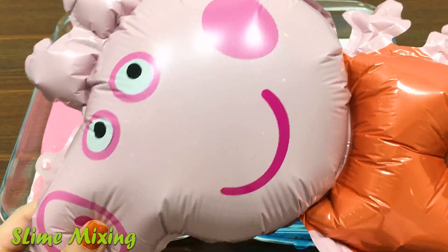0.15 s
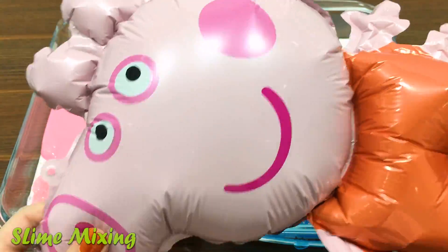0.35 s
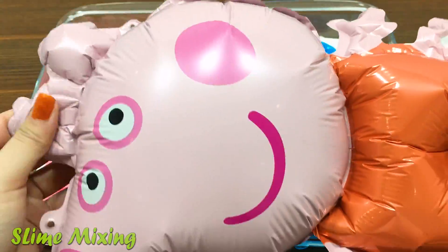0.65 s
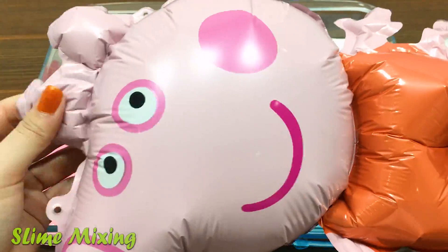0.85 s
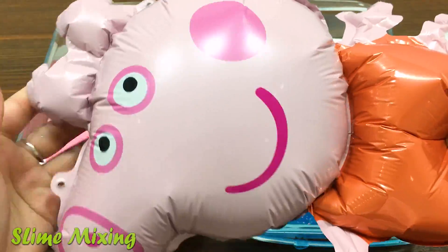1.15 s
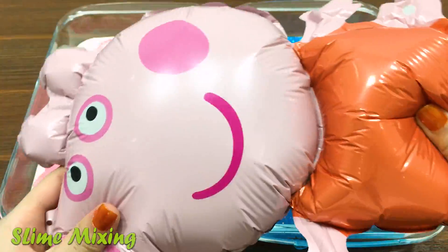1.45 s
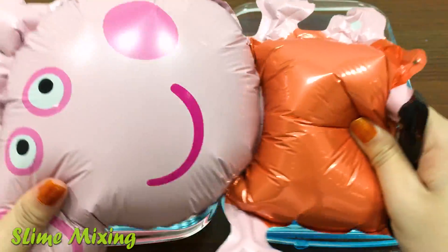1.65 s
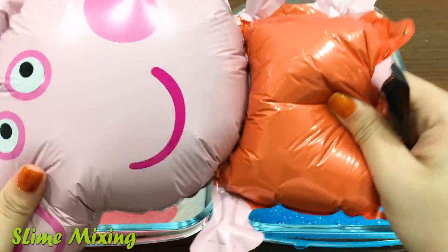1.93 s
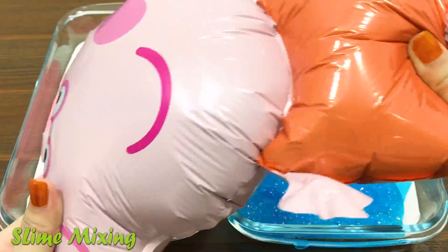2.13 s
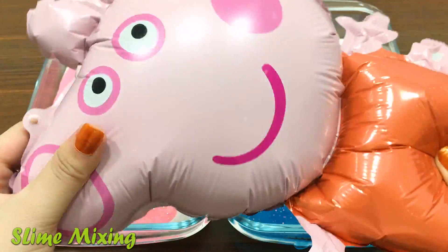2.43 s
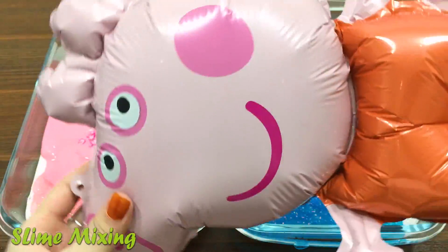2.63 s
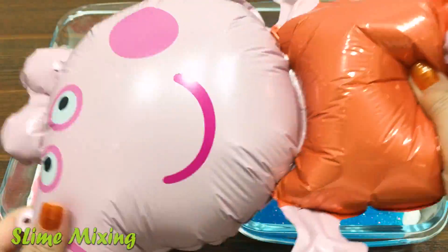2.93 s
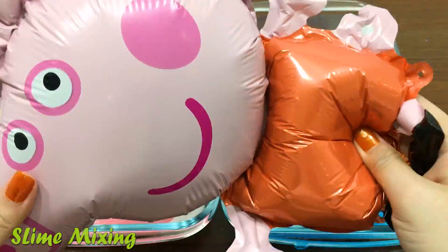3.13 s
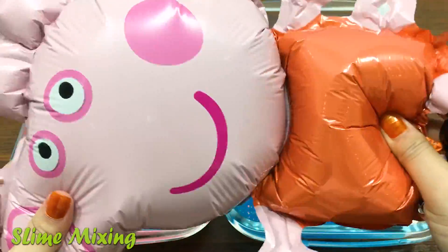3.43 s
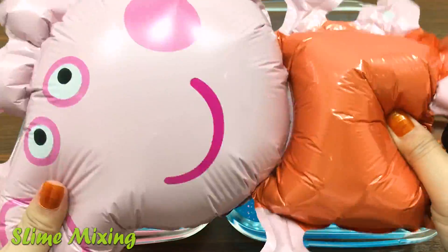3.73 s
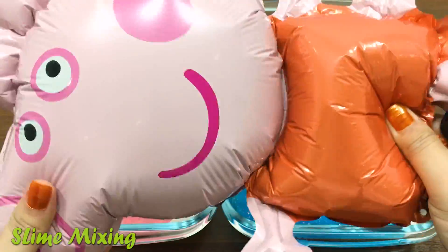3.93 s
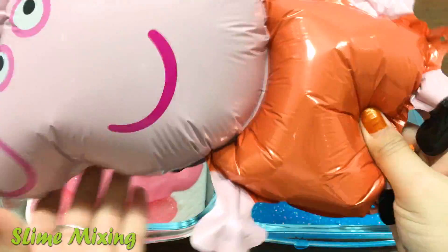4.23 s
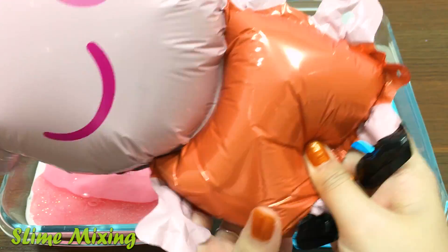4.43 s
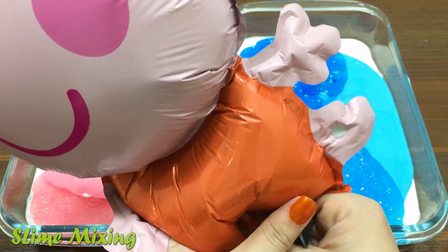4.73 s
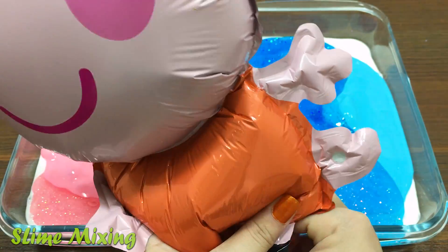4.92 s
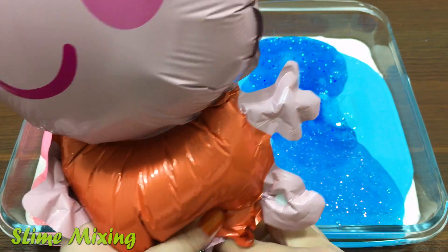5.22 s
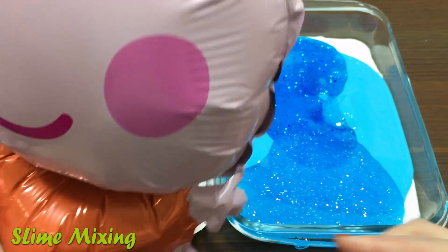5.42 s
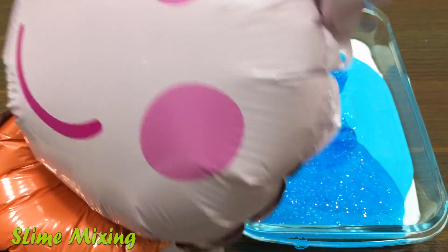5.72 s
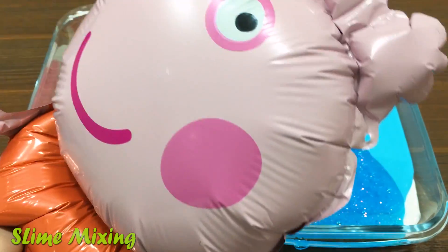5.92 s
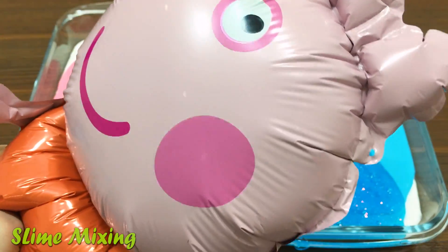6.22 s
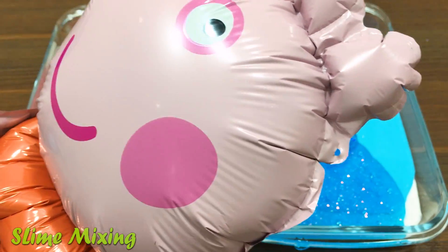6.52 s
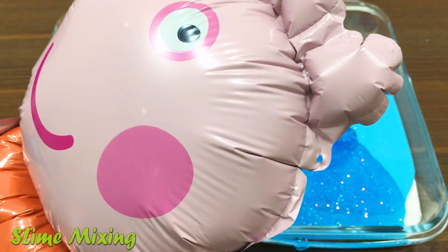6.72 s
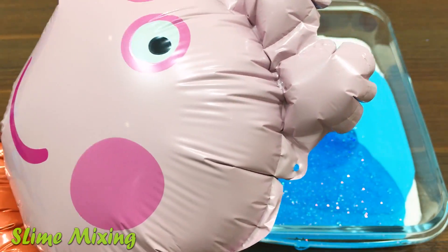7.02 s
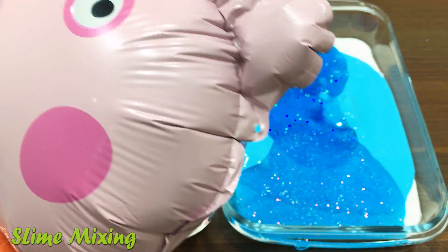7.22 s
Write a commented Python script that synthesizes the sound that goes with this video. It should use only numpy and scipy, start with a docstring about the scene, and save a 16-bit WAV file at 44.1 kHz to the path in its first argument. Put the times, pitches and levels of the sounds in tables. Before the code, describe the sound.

Close to the microphone in a small room, hands work an inflated foil balloon: dry bright snaps over constant fine crackle, with rustling and low skin murmur. Fingers bump the hollow body now and then. Late on, a panel pops through with a crack and short boom. The crinkling stops, and steel scissors lightly tap, scrape and ring on a table top, then rest.

```python
"""Hands squeeze and turn an inflated foil balloon close by in a small room: creases buckle with dry snaps
(short coloured noise bursts) over a finer crackle, while skin and film murmur and rustle (modulated noise).
From 0.6 s fingers bump the hollow body (gliding sine thumps and noise puffs); at 5.9 s a panel pops through.
At 6.7 s the hands let go; steel scissors tap the table top and ring (noise puffs, ringing modes) while they
scrape along it (noise), then come to rest. Sparse decaying echoes and a steady faint hush lie under it all."""
import sys
import numpy as np
from scipy import signal
from scipy.fft import rfft, irfft
from scipy.io import wavfile
from scipy.ndimage import uniform_filter1d

SR = 44100
rng = np.random.default_rng(int(sys.argv[2]) if len(sys.argv) > 2 else 0)


def store_wav(level_fs):
    """Save 16-bit WAV to argv[1]."""
    pcm = np.round(np.clip(np.atleast_2d(level_fs), -1, 1) * 32767)
    wavfile.write(sys.argv[1], SR, pcm.T.astype(np.int16))


N = 324576
TIME = np.arange(N) / SR
LET_GO_S = 6.7

# hands at work: (time [s], pressure on the film [dB], brightness of tight wrinkles [dB],
# drag on the taut skin [dB])
HANDS = [(0, -34, 6, -58), (.16, -49, 4, -59.5), (.5, -48, 4, -57), (.62, -39, 0.5, -50),
         (.79, -62, -12, -66), (.88, -49.5, -0.5, -53.5), (1.33, -43, -2.5, -48.5), (1.48, -52.5, -3, -56),
         (1.63, -43.5, -0.5, -61), (2.23, -37, 2.5, -59.5), (2.48, -45, 0, -58), (2.86, -36.5, 3, -70),
         (3.4, -38.5, 5.5, -51.5), (3.85, -35, 3.5, -50), (4.02, -42.5, 1, -55), (4.3, -36.5, 4, -50),
         (4.55, -45.5, 5, -59), (4.72, -31.5, 0, -59), (5.3, -35.5, -0.5, -60), (5.46, -39, 2.5, -50),
         (5.83, -41, 6, -62.5), (6.1, -35.5, 2.5, -51), (6.38, -53, -4.5, -64), (6.7, -68.5, 3, -69)]
# colour of the fine crackle: (frequency [Hz], relative gain [dB])
FINE_COLOUR = [(100, -9.5), (300, -6), (700, -6), (1300, -4.5), (2400, 0), (3600, -3.5), (4800, 2),
               (6300, -2), (8000, 2.5), (10000, -0.5), (12000, 2), (13700, -2.5), (15300, -1.5)]
# colour of the flapping film: (frequency [Hz], relative gain [dB])
FLAP_COLOUR = [(50, -21.5), (160, -3.5), (250, -2), (330, -3), (500, 0), (720, -4), (1100, -6), (1700, -3),
               (3000, -15), (8000, -18)]
# colour of the taut skin: (frequency [Hz], relative gain [dB])
SKIN_COLOUR = [(28, -35), (60, 8), (150, -1.5), (260, -1), (480, -7.5), (800, -11.5), (4000, -39)]


def amp(db):
    """Decibels to gain."""
    return 10 ** (np.asarray(db) / 20)


def evened(x):
    """Scales to an rms of one."""
    return x / np.sqrt(np.mean(x ** 2) + 1e-20)


def read(points, hz):
    """Interpolates a table on a logarithmic frequency axis."""
    table_hz, value = np.transpose(points)
    return np.interp(np.log(hz + 1), np.log(table_hz + 1), value)


def follow(rows, t):
    """Interpolates every column of a curve at the times t."""
    s, *columns = np.transpose(rows)
    return [np.interp(t, s, column) for column in columns]


def add(mix, s, sound):
    """Mixes a sound in at a time in seconds."""
    part = mix[max(round(s * SR), 0):][:len(sound)]
    part += sound[:len(part)]


def colour(x, db):
    """Causal (minimum-phase) filter with the given gain in each frequency bin."""
    cepstrum = irfft(np.log(amp(db)))
    half = cepstrum.shape[-1] // 2
    # fold the cepstrum onto positive time
    cepstrum[..., 1:half] *= 2
    cepstrum[..., half + 1:] = 0
    return irfft(rfft(x) * np.exp(rfft(cepstrum)))


def noise(points):
    """Steady noise of a given colour, at an rms of one."""
    gain = amp(read(points, np.fft.rfftfreq(N, 1 / SR)))
    return evened(irfft(rfft(rng.standard_normal(N)) * gain, N))


def burst(points, decay_s, size=8192):
    """A dying puff of coloured noise that starts at an rms of about one."""
    t = np.arange(size) / SR
    puff = rng.standard_normal(size) * np.exp(-t / decay_s)
    x = colour(puff, read(points, np.fft.rfftfreq(size, 1 / SR)))
    return x / np.linalg.norm(x) * np.sqrt(decay_s * SR / 2)


def ring(drive, modes):
    """Dying modes rung by a drive signal; the response has unit energy."""
    t = np.arange(SR // 2) / SR
    response = sum(amp(db - 60 * t / t60) * np.sin(2 * np.pi * hz * t) for hz, db, t60 in modes)
    return signal.oaconvolve(drive, response / np.linalg.norm(response))[:N]


def snaps():
    """The large and middling creases, and the crack of the popping panel: small, hard-driven facets flip
    fastest."""
    # loudest creases buckling, and the crack of the panel popping through at 5.89 s: (time [s], level over 1 ms
    # [dB], facet pitch [Hz])
    loud_snaps = [(0.0136, -20.5, 7100), (0.1098, -27, 6640), (.174, -21.5, 6270), (.2327, -24, 6800),
                  (0.3048, -17, 5140), (0.3859, -21, 8500), (0.451, -18, 6700), (.5192, -24.5, 7500),
                  (0.6251, -22, 970), (0.867, -19.5, 5970), (0.888, -21, 5960), (0.901, -19, 8500),
                  (0.9357, -12, 5360), (0.9415, -10, 4600), (1.0633, -21, 3120), (1.0958, -15, 6450),
                  (1.1424, -14, 3120), (1.1611, -11.5, 4200), (1.2459, -19, 2900), (1.319, -14, 3700),
                  (1.6055, -18, 4700), (1.6448, -18.5, 5400), (1.6866, -21, 3530), (1.7835, -24, 1100),
                  (1.9067, -11.5, 1400), (2.0373, -21, 8600), (2.1362, -17.5, 5070),
                  (2.2746, -13.5, 3500), (2.3099, -18, 10200), (2.3692, -16.5, 4850),
                  (2.5431, -16.5, 3300), (2.5863, -18, 2610), (2.6076, -8, 4500), (2.647, -16, 4900),
                  (2.663, -9, 4500), (2.8343, -20, 6360), (2.8873, -7, 7350), (2.983, -20, 3620),
                  (3.1209, -20, 11600), (3.2972, -13.5, 2780), (3.5539, -12.5, 5970), (3.6364, -11, 6600),
                  (3.651, -13.5, 4600), (3.7528, -14.5, 7100), (3.7993, -15, 4400), (3.9652, -19, 6300),
                  (4.1614, -24, 4800), (4.2052, -19, 4150), (4.3064, -17, 4750), (4.5074, -18.5, 10200),
                  (4.593, -18.5, 3800), (4.6378, -20, 4300), (4.669, -9, 4400), (4.8273, -18, 4070),
                  (4.9508, -19, 2520), (5.0439, -17, 2430), (5.1975, -14, 5000), (5.2801, -11, 2400),
                  (5.2921, -15.5, 2600), (5.3747, -14, 8500), (5.6413, -15, 4400), (5.7117, -17, 5600),
                  (5.7263, -16.5, 8050), (5.7863, -13, 5600), (5.8873, -9, 1850), (5.9666, -17, 6760),
                  (6.015, -20.5, 5900), (6.0527, -20.5, 4000), (6.185, -17.5, 5230), (6.2554, -18, 6860),
                  (6.3292, -22.5, 1570), (6.4622, -28, 6500), (6.5412, -22, 6800), (6.5614, -19.5, 5800)]
    # film colour: (frequency [Hz], relative gain [dB])
    film_colour = [(100, -11), (300, -9), (600, -2), (1000, 0.5), (1600, -0.5), (2400, 2.5), (3600, -4.5),
                   (4600, 0), (6300, -4), (8000, -1.5), (10000, -3), (12000, -2), (13700, -4.5),
                   (15300, 2.5)]
    ref_ms, ref_hz, ref_db = 0.51, 5000, -17  # length of a snap of this pitch and level
    pitch_slope, halving_db, scatter_octaves = 0.7, 17, 1  # halving_db more level halves the length

    s, db, hz = np.vstack([strays(), loud_snaps]).T
    haste_octaves = (ref_db - np.maximum(db, ref_db)) / halving_db
    octaves = haste_octaves + scatter_octaves * (rng.random(len(s)) - .5)
    length_ms = ref_ms * (ref_hz / hz) ** pitch_slope * 2 ** octaves
    rows = np.transpose([s, db, hz, length_ms])
    return buckles(rows, film_colour, focus_db=9.5, flutter_db=-9.5, flutter_ms=2.4)


def strays(count=100):
    """Middling creases flip at random, louder as the film is worked harder: rows (s, dB, Hz)."""
    base_db, spread_db = 10, 6.5  # above the effort
    slot, size, facet = rng.random((count, 3)).T
    s = (np.arange(count) + slot) / count * LET_GO_S
    effort_db = 20 * np.log10(np.interp(s, TIME, effort()) + 1e-9)
    db = effort_db + base_db + spread_db * size
    octaves = 0.062 * follow(HANDS, s)[1] + 1.52 * (facet - .5)
    return np.transpose([s, db, 5000 * 2 ** octaves])


def buckles(rows, film, focus_db, flutter_db, flutter_ms, size=384):
    """Each crease flips with a brief burst, brighter for a small facet, and the film around it flutters on."""
    s, db, centre_hz, length_ms = np.transpose(rows)[:, :, None]
    ms, hz = np.arange(size) / SR * 1000, np.fft.rfftfreq(size, 1 / SR)
    flip = np.exp(-(ms / (2.2 * length_ms)) ** 2)
    flutter = amp(flutter_db) * np.exp(-ms / flutter_ms)
    octaves = np.log2(np.maximum(hz, 600) / centre_hz)
    # every facet has its own resonances
    spacing, offset = rng.random((len(s), 2)).T[:, :, None]
    own_db = 5.06 * np.cos(2 * np.pi * (octaves * (0.38 + 0.67 * spacing) + offset))
    gain_db = read(film, hz) + own_db - focus_db * np.sqrt(1 + octaves ** 2)
    x = colour(rng.standard_normal((len(s), size)) * (flip + flutter), gain_db)
    # energy of each burst set as an rms over 1 ms
    x *= amp(db) * np.sqrt(SR / 1000) / np.linalg.norm(x, axis=1, keepdims=True)
    out = np.zeros(N)
    for at, click in zip(s[:, 0], x):
        add(out, at, click)
    return out


def crackle(creases, count=2000):
    """Some 300 small wrinkles a second, of very uneven size, swelling around each larger crease."""
    slot, size, facet, length = rng.random((count, 4)).T
    s = (np.arange(count) + 3 * slot) / count * LET_GO_S
    size_db = 5.3 * np.minimum(-np.log(1 - size), 2.5)
    facet_hz = 4500 * 2 ** (.15 * follow(HANDS, s)[1] + 2.84 * (facet - .5))
    rows = np.transpose([s, size_db, facet_hz, 0.25 + 0.64 * length])
    x = buckles(rows, FINE_COLOUR, focus_db=5.5, flutter_db=-8.0, flutter_ms=2.9)
    # wrinkles share the strain of each moment
    strain = np.sqrt(abs(uniform_filter1d(x ** 2, size=1700)) + .01)
    released = np.sqrt(abs(uniform_filter1d(creases ** 2, size=800)))
    work = effort()
    return x / strain * np.sqrt(work ** 2 + 0.64 * work * released)


def effort():
    """How hard the film is worked: hand pressure, plus a quick swell for each fold that gives way."""
    # folds giving way: (time [s], length with attack [s], swell level [dB])
    folds = [(.01, 0.027, -46), (0.087, .025, -40), (.229, 0.028, -35), (.302, .02, -40),
             (0.361, 0.023, -41.5), (0.44, 0.0096, -42), (0.51, .012, -38), (0.865, 0.086, -38),
             (1.072, 0.036, -42), (1.142, 0.016, -30.5), (1.305, 0.017, -36.5), (1.677, 0.012, -40),
             (1.854, 0.068, -38.5), (2.1, 0.0076, -62), (2.184, 0.018, -34.5), (2.276, 0.024, -26.5),
             (2.406, 0.0076, -38), (2.503, 0.058, -35.5), (2.618, 0.072, -38), (2.829, 0.03, -41),
             (3.151, 0.017, -31.5), (3.266, 0.068, -36.5), (3.455, 0.061, -45), (3.711, .025, -35.5),
             (3.805, 0.023, -33.5), (3.958, 0.012, -31.5), (4.032, 0.014, -35.5), (4.113, 0.068, -34.5),
             (5.213, 0.058, -37), (5.328, 0.021, -39), (5.489, .025, -29.5), (5.877, 0.043, -34.5),
             (6.087, 0.012, -29.5)]
    attack_s, release_s = 0.0033, 0.013
    out = amp(follow(HANDS, TIME)[0]) * (TIME < LET_GO_S)
    t = np.arange(SR // 4) / SR
    for s, length_s, db in folds:
        release = np.exp(-np.maximum(t - length_s, 0) / release_s)
        add(out, s, amp(db) * np.minimum(t / attack_s, 1) * release)
    return out


def bumps():
    """A finger pushes the skin in and the loose film flaps."""
    # finger bumps: (time [s], thump level [dB], settled skin pitch [Hz], film flap level [dB])
    finger_bumps = [(0.581, -38, 64.3, -36), (.630, -36.5, 211, -31.5), (0.83, -24, 100, -36),
                    (.930, -30, 220, -24.5), (.942, -18.5, 185, -40), (1.056, -32.5, 89, -36),
                    (1.142, -26, 220, -35.5), (1.160, -29, 99, -32), (1.317, -30.5, 76, -42),
                    (1.512, -32.5, 86, -38), (1.779, -42.5, 95, -37), (1.906, -46, 224, -36),
                    (2.196, -36, 75, -36.5), (2.252, -43, 67, -34.5), (3.283, -45, 220, -32),
                    (3.345, -42, 74, -57), (3.46, -42, 84, -50), (3.628, -36, 220, -38),
                    (4.331, -25, 240, -32), (4.343, -28.5, 67, -41), (4.464, -27.5, 62.6, -41),
                    (4.667, -40.5, 69.6, -37), (5.277, -32, 85, -23.5), (5.503, -40, 64, -42),
                    (6.050, -35, 220, -27.5), (6.094, -35, 80, -26.5)]
    out = np.zeros(N)
    for s, db, hz, flap_db in finger_bumps:
        add(out, s, amp(db) * thump(hz, cycles=0.69, rise=0.85, glide=0.27))
        add(out, s, amp(db - 12.5) * burst(SKIN_COLOUR, decay_s=0.02))
        add(out, s, amp(flap_db) * burst(FLAP_COLOUR, decay_s=0.013))
    return out


def pop():
    """A taut panel turns over at once with a crack and the whole balloon booms."""
    # panel popping through: (time [s], thump level [dB], final pitch [Hz], film flap level [dB])
    panel = (5.8888, -7, 202, -18)
    s, db, hz, flap_db = panel
    out = np.zeros(N)
    add(out, s, amp(db) * thump(hz, cycles=0.82, rise=0.14, glide=0.79))
    add(out, s + 0.0038, amp(db - 17.0) * thump(hz / 2, cycles=0.93, rise=0.27, glide=0.3))
    crack = burst(FLAP_COLOUR, decay_s=.011) + burst(FINE_COLOUR, decay_s=0.005)
    add(out, s - .002, amp(flap_db) * crack)
    add(out, s, amp(flap_db - 5) * burst(FLAP_COLOUR, decay_s=0.042))
    return out


def thump(hz, cycles, rise, glide):
    """The skin swings a cycle or two: short waves arrive first, so the pitch drops as it settles."""
    age = np.arange(SR // 8) / SR * hz  # in cycles, as are rise and glide
    turns = age + glide * (1 - np.exp(-age / 0.49))
    x = np.sin(2 * np.pi * turns) * (1 - np.exp(-age / rise)) * np.exp(-age / cycles)
    return x / abs(x).max()


def rub():
    """The taut skin murmurs under the fingers and the film rustles unevenly between the creases."""
    # rustle colour: (frequency [Hz], relative gain [dB])
    rustle_colour = [(150, -16), (450, -2), (900, -1.5), (2300, 2), (3600, 0), (4800, -5), (16000, -14.5)]
    grip = evened(uniform_filter1d(rng.standard_normal(N), size=900))
    slips = evened(uniform_filter1d(rng.standard_normal(N), size=200))
    murmur = noise(SKIN_COLOUR) * amp(follow(HANDS, TIME)[2] + 4.5 * grip)
    rustle = noise(rustle_colour) * effort() * amp(-9 + 4.9 * slips)
    return murmur + rustle


def cavity(drive):
    """Air enclosed in the balloon resonates with the body and film sounds."""
    # air modes: (frequency [Hz], relative level [dB], t60 [s])
    air_modes = [(253.3, -3, 0.3), (399, 2, 0.43), (441, -2.5, 0.41), (471, 0.5, 0.22), (509, -2, 0.36),
                 (604, -1, .3), (740, -11, .3), (874, -7, .3)]
    return amp(-30) * ring(drive, air_modes)


def scissors():
    """Steel scissors tap the table top and ring while they scrape along it, then come to rest."""
    # touches on the table: (time [s], tap level before an 11 dB cut [dB], blade contact level [dB])
    touches = [(6.709, -31, -34.5), (6.751, -32, -39), (6.774, -27, -57), (6.858, -33, -37.5),
               (6.901, -32, -55), (6.948, -28, -61), (6.983, -20, -35), (7.029, -30, -50),
               (7.092, -36.5, -39.5), (7.128, -32, -42)]
    # steel blade modes: (frequency [Hz], relative level [dB], t60 [s])
    steel_modes = [(2196, -1, .6), (4086, -16, .35), (5900, -19, 0.58), (8339, -11, .42), (9060, 2, 0.23),
                   (11900, -11, 0.44), (12543, -9, .5), (14225, 1, 0.31), (15520, -7, .3)]
    # table top colour: (frequency [Hz], relative gain [dB])
    table_colour = [(100, -22), (460, -7), (800, -13), (1200, 0), (1700, -4), (2300, -5), (3500, -9.5),
                    (4200, -10), (6500, -17.5), (8500, -17), (10500, -27), (15500, -22)]
    # blade contact colour: (frequency [Hz], relative gain [dB])
    blade_colour = [(100, -26), (600, 4), (1200, -3), (2400, -2.5), (3600, -8), (4400, 5.5), (6300, 2),
                    (8000, 3), (9300, 4), (10500, -3), (13400, 1), (14300, -1), (15300, 0)]
    start_s, fade_start_s, attack_s = 6.7, 7.044, .012
    slide_db, fade_db_per_s = -51, 74

    slips = evened(uniform_filter1d(rng.standard_normal(N), size=200))
    attack = np.clip((TIME - start_s) / attack_s, 0, 1)
    slide = attack * amp(slide_db - fade_db_per_s * np.maximum(TIME - fade_start_s, 0))
    out = noise(table_colour) * slide * amp(3.4 * slips)
    contact = np.zeros(N)
    for s, db, contact_db in touches:
        add(out, s, amp(db - 11) * burst(table_colour, decay_s=0.0079))
        add(contact, s, amp(contact_db) * burst(blade_colour, decay_s=0.0049))
    return out + contact + amp(-2.5) * ring(contact, steel_modes)


def room(x, count=4):
    """Sound hops at random between a few spots, each with its own echoes."""
    spot = rng.integers(0, count, N // 512 + 1)[np.arange(N) // 512]
    shares = [np.sqrt(abs(uniform_filter1d((spot == k) * 1., size=128))) for k in range(count)]
    return sum(signal.oaconvolve(x * share, reflections())[:N] for share in shares)


def reflections(size=256):
    """Sparse echoes of random sign, each band dying at its own speed."""
    # room decay: (frequency [Hz], t60 [s])
    decay_table = [(150, 0.23), (500, 0.45), (1500, 0.54), (4000, 0.4), (9000, 0.29), (16000, 0.3)]
    n = SR // 2
    # 12 % of the taps sound, after a 7 ms gap
    taps = rng.standard_normal(n) * (rng.random(n) < .12) * (np.arange(n) > .007 * SR)
    hz, t, z = signal.stft(taps, SR, nperseg=size)
    decay = amp(-60 * t / read(decay_table, hz)[:, None])
    tail = signal.istft(z * decay, SR, nperseg=size)[1]
    return tail / np.linalg.norm(tail)


def hush():
    """Steady, mostly low background noise."""
    # background colour: (frequency [Hz], relative gain [dB])
    hush_colour = [(25, -29), (50, -10), (90, 4), (140, -7.5), (300, -23), (700, -20), (2000, -31),
                   (16000, -32)]
    return amp(-60.0) * noise(hush_colour)


def scene():
    """The balloon is close; the scissors lie further off, with more echo."""
    creases = snaps()
    film = creases + crackle(creases)
    body = bumps() + pop() + rub()
    steel = scissors()
    body = body + cavity(body + 0.66 * film)
    echo = room(amp(-11.5) * film + amp(-10.5) * body + amp(-5.0) * steel)
    return (film + body + steel + echo + hush())[None]


def record(dry):
    """The deepest bass is cut away; then full-scale limit and band limit."""
    bass_hz, edge_hz = 40, 16000
    thin = signal.sosfilt(signal.butter(2, bass_hz, "highpass", fs=SR, output="sos"), dry)
    lowpass = signal.firwin(401, edge_hz, window=("kaiser", 8), fs=SR)
    return signal.oaconvolve(np.clip(thin, -1, 1), lowpass[None], "same")


dry = scene()
out = record(dry)
store_wav(out)
```